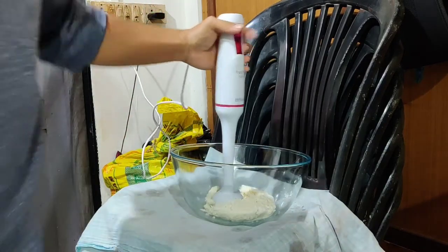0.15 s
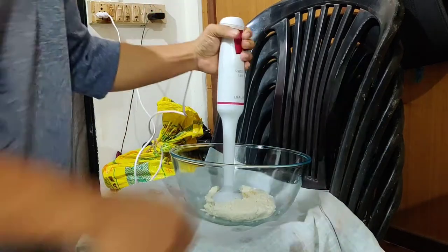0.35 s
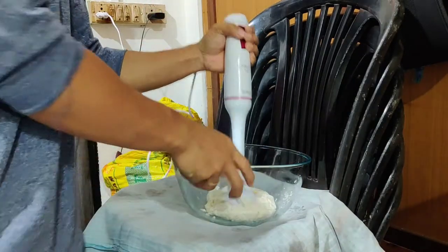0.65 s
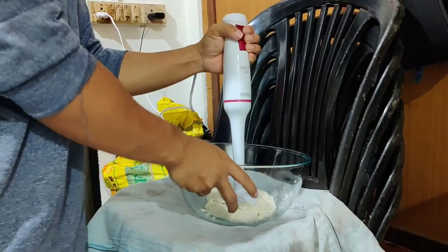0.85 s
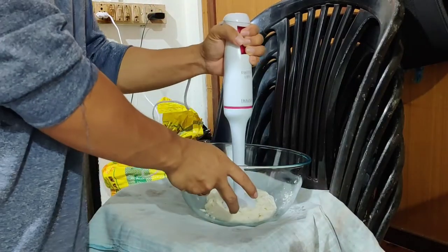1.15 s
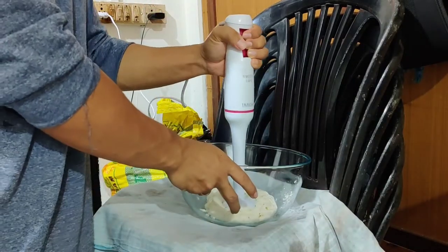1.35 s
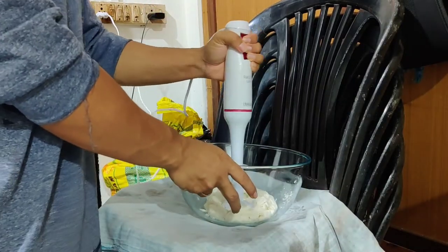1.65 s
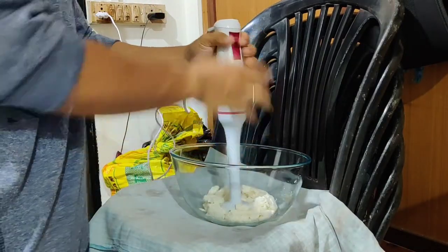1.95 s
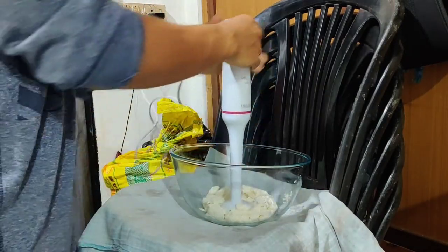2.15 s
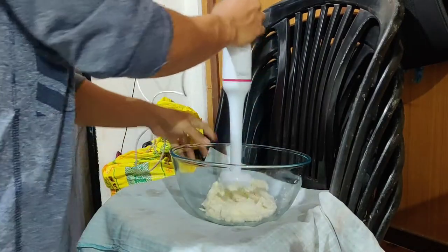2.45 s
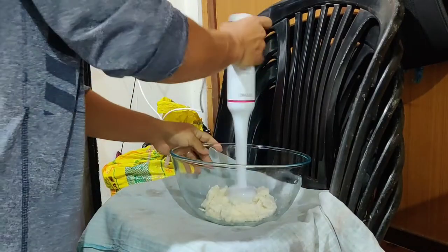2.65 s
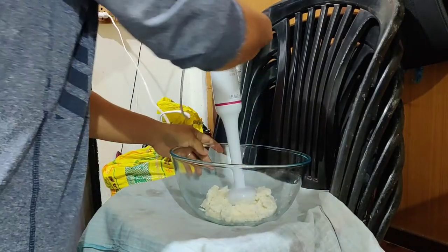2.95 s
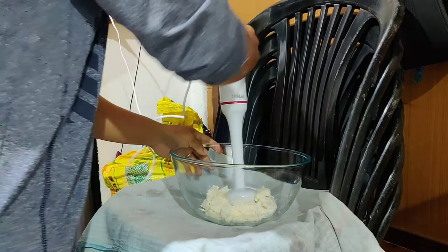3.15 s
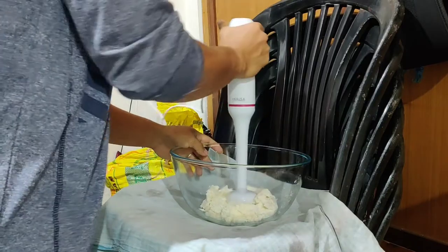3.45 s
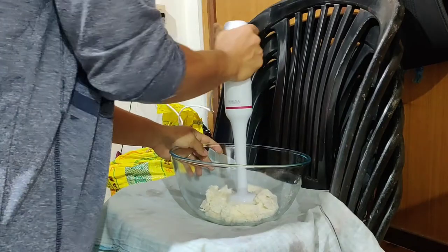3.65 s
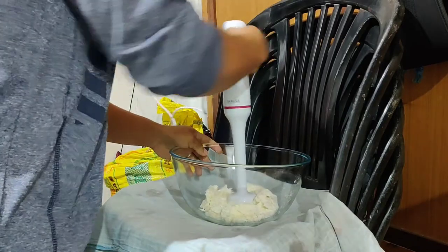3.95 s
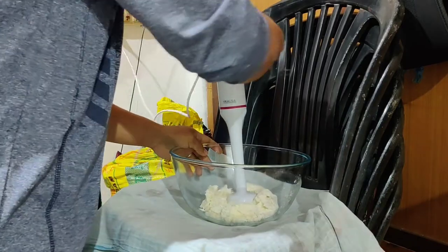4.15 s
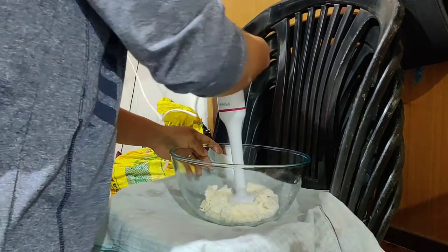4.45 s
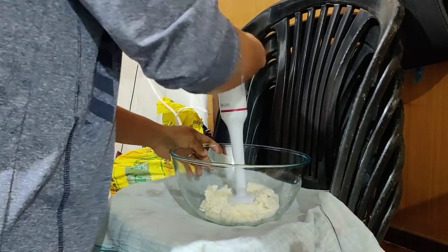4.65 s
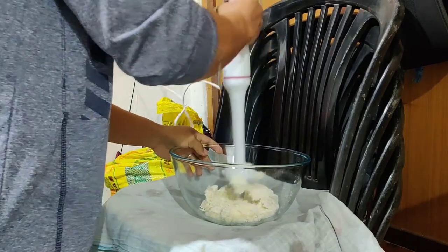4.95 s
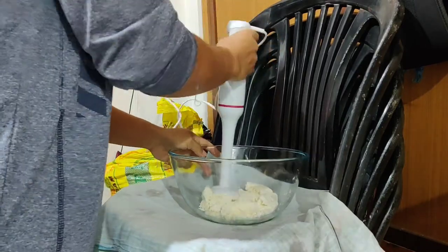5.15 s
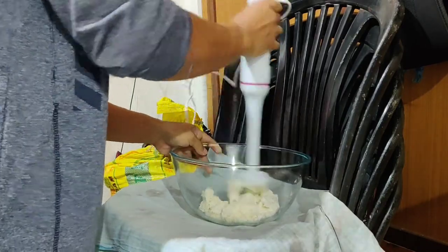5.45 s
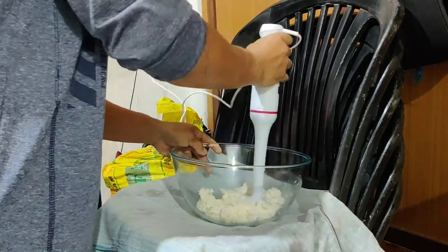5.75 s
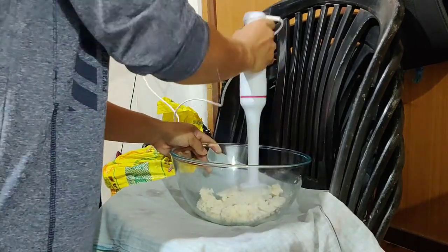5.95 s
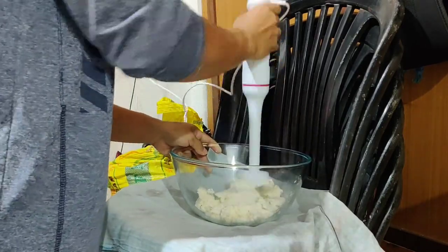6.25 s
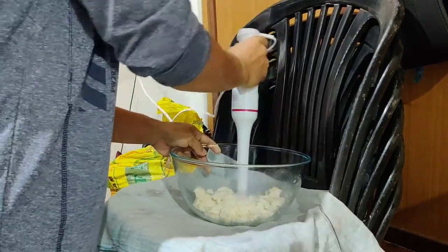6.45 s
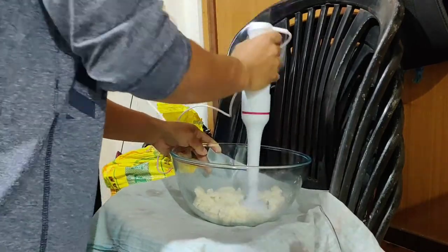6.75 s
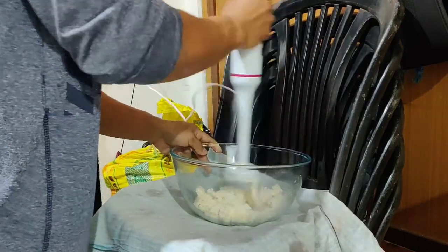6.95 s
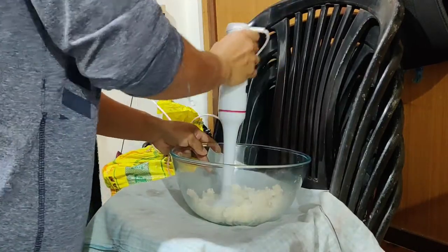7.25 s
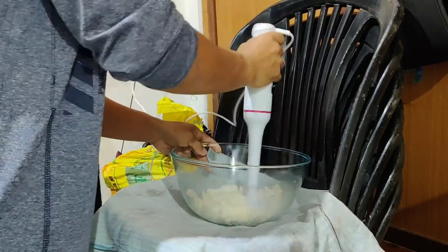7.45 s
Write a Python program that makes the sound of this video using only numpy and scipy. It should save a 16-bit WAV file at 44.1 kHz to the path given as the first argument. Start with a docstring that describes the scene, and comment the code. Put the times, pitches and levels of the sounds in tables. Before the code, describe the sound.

In a small, hard-walled kitchen, light knocks and sleeve rustle sound over a faint appliance murmur. A switch ticks and a stick blender whirs in a glass bowl of thick cream cheese, whining, rattling and splattering until it stops with a dull thud. After a pause comes a second burst, then seven quick pulses with ticks in between, all picked up in stereo by a nearby phone.

```python
"""A mains-driven stick blender works thick cream cheese in a glass bowl, in a small hard kitchen.
First come small knocks and sleeve rustle over a murmur of appliances. At 1.2 s the switch ticks and a
long burst begins: the shaft's orders sing through the housing with mains ripple, over rattle, splatter
and brush hiss, until the blade stalls with a thud. A second long burst follows at 4.3 s, then seven quick
pulses from 5.2 s, with ticks in the pauses. A phone with two unlike ports listens throughout."""
import sys
import numpy as np
from scipy import signal
from scipy.fft import rfft, irfft, next_fast_len
from scipy.io import wavfile
from scipy.ndimage import uniform_filter1d

SR = 44100
rng = np.random.default_rng(int(sys.argv[2]) if len(sys.argv) > 2 else 0)


def unload_audio(sound):
    """Save the sound as a 16-bit wav file, at the path given as the first command line argument."""
    columns = np.transpose(np.atleast_2d(sound))
    # keep every value between -1 and 1, then stretch to whole-number steps
    steps = np.round(np.clip(columns, -1, 1) * 32767)
    wavfile.write(sys.argv[1], SR, steps.astype(np.int16))


N = 335043
T = np.arange(N) / SR
MAINS_RIPPLE_HZ = 99.56
# the blade stalls as the switch lets go: t/s, thud level/dB, rattle level/dB, splatter level/dB
BLADE_STALLS = [(1.984, -30.5, -36.5, -32), (4.812, -19, -31.5, -29.5), (5.454, -34.5, -59, -44),
                (6.246, -28, -51, -40), (6.583, -28, -42, -38), (6.94, -27.5, -34, -36),
                (7.295, -23.5, -30.5, -33)]


def blender(press, load):
    """Rotating machinery: one shaft angle drives the tones and modulates the noises. Returns both."""
    on, off, start_hz, rattle_db, splatter_db, brush_db, pan_db = press
    spin_up_s, attack_s, release_s = .03, .025, .04
    t = np.arange(on, off + release_s, 1 / SR)
    times, *columns = np.transpose(load)
    hz, whine_db, second_db = (np.interp(t, times, column) for column in columns)
    hz -= (hz - start_hz) * np.exp(-((t - on) / spin_up_s) ** 2)
    shaft_hz = hz / 4 * (1 + .002 * walk(40, len(t)))
    turn = 2 * np.pi * np.cumsum(shaft_hz) / SR
    mains = 2 * np.pi * MAINS_RIPPLE_HZ * t
    tones = motor_whine(turn, mains, whine_db, second_db, pan_db)
    # one knock a turn and the mains ripple roughen the noises
    roughness = (1 + .087 * np.cos(turn)) * (1 + .07 * np.cos(mains))
    noises = housing_rattle(t, turn, mains, roughness, rattle_db)
    noises += roughness * cheese_splatter(t, splatter_db, brush_db)
    starting = np.clip(1 - (t - on) / attack_s, 0, 1)
    stopping = np.clip((t - off) / release_s, 0, 1)
    switch = undb(-24.5 * starting - 16.5 * stopping) * np.minimum(1, (t[-1] - t) / .0051)
    return tones * switch * undb(-63 * stopping), noises * switch


def motor_whine(turn, mains, whine_db, second_db, pan_db):
    """Modulation: mains ripple puts sidebands on the fourth shaft order; the second sounds below it."""
    size, ripple = len(turn), .096
    fourth = np.sin(4 * turn + ripple * np.sin(mains + 1.1)) * (1 + ripple * np.cos(mains))
    fourth *= undb(whine_db + 1.8 * walk(30.1, size))
    sides = np.array([[1], [-1]])
    swaying_pan_db = pan_db + 4.5 * walk(12, size)
    second = np.sin(2 * turn) * undb(second_db + 1.2 * sides + walk(30, size))
    return np.sqrt(2) * (fourth * undb(sides * swaying_pan_db / 2) + second)


def housing_rattle(t, turn, mains, roughness, level_db):
    """Forced vibration: the housing radiates hum, weak shaft orders and noise, surging at each stall."""
    # weaker shaft orders: multiple of the shaft rate, level/dB re the rattle
    weak_orders = [(1, -23), (3, -16), (5, -36.5), (6, -13), (7, -8), (8, -8), (9, -13.5), (10, -14.5),
                   (11, -12.5), (12, -16), (13, -9)]
    # housing noise: f/Hz, spectrum level/dB
    rattle_spectrum = [(70, -30.5), (150, -17), (300, -11.5), (550, -0.5), (1100, -2.5), (1900, 0.5),
                       (2500, -1.5), (3200, -7)]
    size = len(t)
    vibration = roughness * noise(rattle_spectrum, size) * undb(.65 * walk(45, size))
    vibration += undb(-25) * np.sin(mains)
    for order, db in weak_orders:
        # each order comes and goes as the load shifts, with its own path to each port
        phase = rng.uniform(0, 2 * np.pi) + rng.normal(0, .12 * order, (2, 1))
        partial = np.sin(order * turn + phase + .5 * np.sin(mains))
        vibration += partial * undb(db + 4.15 * walk(11.98, size))
    shaken = swells(t, [stall_surge(s, db) for s, _, db, _ in BLADE_STALLS])
    return vibration * np.sqrt(undb(2 * level_db) + shaken)


def cheese_splatter(t, splatter_db, brush_db):
    """Incoherent sources add in power: spurts of cheese swell the blade's splatter and brush hiss."""
    # cheese flung against the glass: t/s, level/dB, half-length/s
    spurts = [(1.29, -51, 0.034), (1.65, -37.5, 0.05), (1.753, -29.5, 0.0301), (1.858, -31.5, 0.03),
              (1.925, -30, .05), (1.991, -36.5, 0.0295), (4.365, -49, 0.0099), (6.1, -38.5, 0.014),
              (6.457, -31.5, 0.017), (7.21, -40.5, 0.024)]
    # wet splatter and the higher brush hiss: f/Hz, spectrum level/dB
    splatter_spectrum = [(1900, -24.5), (2600, -2), (4000, 2.5), (5500, -2.5), (6400, -5), (7500, -29)]
    brush_spectrum = [(5500, -33.5), (6600, 1), (9000, -2), (11000, -3), (14500, -7.5), (16000, -17)]
    size = len(t)
    flung = swells(t, spurts + [stall_surge(s, db) for s, _, _, db in BLADE_STALLS])
    splatter = noise(splatter_spectrum, size) * undb(1.3 * walk(59.2, size))
    brush = noise(brush_spectrum, size) * undb(.55 * walk(78, size))
    splatter_power = undb(2 * splatter_db) + flung
    brush_power = undb(2 * brush_db) + flung * undb(-4) ** 2
    return splatter * np.sqrt(splatter_power) + brush * np.sqrt(brush_power)


def stall(db, start_hz=616, t60=.06):
    """Viscous braking: the cheese stops the blade, so the whine slides down over a dull thud."""
    t = np.arange(int(t60 * SR)) / SR
    slide = np.sin(2 * np.pi * np.cumsum(start_hz * np.exp(-t / .028)) / SR)
    thud = noise([(80, -13.5), (220, -3.5), (600, 14.5), (1300, -11), (2200, -24.5)], len(t))
    return undb(db - 60 * t / t60) * np.minimum(t / .0022, 1) * (1.3 * slide + .81 * thud)


def stall_surge(s, db):
    """A braking transient peaks just after the stall: t/s, level/dB, half-length/s."""
    return s + .016, db, .022


def tick(db, hz, t60=.03):
    """Impact excitation: a sharp contact gives a broad, damped puff of noise round the part's pitch."""
    t = np.arange(int(t60 * SR)) / SR
    band = [(hz / 6, -30), (hz / 3.7, -6), (hz, 0),
            (min(hz * 2.22, 15000), -7), (min(hz * 5, 20000), -26)]
    return undb(db - 3 - 60 * t / t60) * noise(band, len(t))


def throbbing_band(length, hz, width, db):
    """Band-limited noise, throbbing at random: a whistle or ring when narrow, a scrape when wide."""
    t = np.arange(int(length * SR)) / SR
    band = [(hz - 2 * width, -40), (hz - width / 2, -3), (hz, 0),
            (hz + width / 2, -3), (hz + 2 * width, -40)]
    fade = np.minimum(1, np.minimum(t, length - t) / .0085)
    return noise(band, len(t)) * undb(db + 2.5 * walk(30, len(t))) * fade


def kitchen(x, t60, echo_db):
    """Reverberation: the direct sound plus a diffuse tail that decays exponentially."""
    t = np.arange(int(t60 * SR)) / SR
    response = noise([(20, .11), (300, 1), (16000, -.78)], len(t))
    response *= undb(-60 * t / t60) * np.minimum(t / .01, 1)
    response *= undb(echo_db) / np.sqrt(np.sum(response ** 2) / 2)
    response[:, 0] = 1  # the direct path
    return signal.fftconvolve(np.atleast_2d(x), response, axes=1)


def background(hum_hz=136.5):
    """Ambient noise: appliances, air, sleeves and handling superpose, each flickering a little."""
    # noise floor: t/s, appliance murmur level/dB, air hiss level/dB, handling rumble level/dB
    floor = [(0, -67.5, -73, -44.5), (.6, -65.5, -61.5, -51.5), (1.149, -66, -75, -59.5),
             (2.4, -65.5, -66, -60.5), (4.199, -66.5, -74, -70), (5.1, -64, -85, -64.5),
             (5.7, -70, -78.5, -98.5), (7.6, -67.5, -89, -92)]
    # sleeve rustles: t/s, level/dB, half-length/s
    sleeves = [(0.523, -59, 0.069), (0.78, -48.5, 0.082), (1.12, -67.5, 0.035), (2.513, -63, 0.019),
               (2.713, -65, .03), (3.802, -68, 0.24), (4.26, -65, .02), (5.201, -71, 0.033),
               (5.585, -66.5, 0.062), (6.071, -58, 0.014), (6.453, -65, 0.043), (6.786, -59, 0.027),
               (7.116, -54.5, 0.015), (7.51, -63, 0.051)]
    # appliance murmur, and the hiss of air and cloth: f/Hz, spectrum level/dB
    murmur_spectrum = [(24, -23.5), (40, -8.5), (112, -10.5), (130, -11.5), (242, -7), (315, -14),
                       (371, -9.5), (498, -10.5), (1020, -15), (2000, -27.5), (2600, -64), (4400, -120)]
    rustle_spectrum = [(600, -30), (1300, -7.5), (3000, -2), (6000, -4.5), (10000, -5.5), (13000, -8.5),
                       (16000, -15)]
    times, *columns = np.transpose(floor)
    murmur_db, air_db, rumble_db = (np.interp(T, times, column) for column in columns)
    murmur = noise(murmur_spectrum, N) + undb(-9.5) * np.sin(2 * np.pi * hum_hz * T + walk(3.6, N))
    murmur *= undb(murmur_db + .78 * walk(15, N))
    rustle_power = undb(2 * air_db) + swells(T, sleeves)
    rustle = noise(rustle_spectrum, N) * np.sqrt(rustle_power) * undb(1.2 * walk(25, N))
    rumble = noise([(2, -1), (8, .5), (20, -8), (45, -24)], N) * undb(rumble_db + 2.7 * walk(2.7, N))
    return murmur + rustle + rumble


def noise(spectrum, size):
    """Partial coherence: stereo noise of rms 1, most alike in the bass, from rows of f/Hz, level/dB."""
    # likeness of the sound at the two ports: f/Hz, correlation
    coherence = [(30, 0.12), (80, 0.48), (300, 0.74), (600, 0.52), (1200, 0.048), (3000, 0.31), (6000, 0)]
    fast = next_fast_len(size)
    like = np.clip(over_hz(coherence, fast), 0, 1)
    gain = undb(over_hz(spectrum + [(spectrum[-1][0] * 1.1, -90)], fast))
    mid, side = rfft(rng.standard_normal((2, fast))) * gain
    mid, side = mid * np.sqrt(1 + like), side * np.sqrt(1 - like)
    x = irfft([mid + side, mid - side], fast)[:, :size]
    return x / np.sqrt(np.mean(x ** 2))


def swells(t, rows):
    """Power summation of bell-shaped swells given as t/s, level/dB, half-length/s."""
    return sum(undb(2 * db) * np.exp(-((t - s) / half) ** 2) for s, db, half in rows)


def walk(rate, size):
    """Random fluctuation: values held 1 / rate s and slewed, with a spread near 1."""
    hold = int(SR / rate)
    steps = np.repeat(rng.standard_normal(size // hold + 1), hold)
    return 1.285 * uniform_filter1d(steps, hold)[:size]


def over_hz(table, size):
    """Interpolation of a table at the bins of a transform, on a log-frequency axis."""
    hz, value = np.transpose(table)
    return np.interp(np.log(np.arange(size // 2 + 1) * SR / size + 1), np.log(hz), value)


def undb(db):
    """Amplitude ratio of a level."""
    return 10 ** (np.asarray(db) / 20)


def add(out, x, s):
    """Superposition of x on out from time s."""
    i = int(s * SR)
    out[:, i:i + x.shape[-1]] += x[..., :N - i]


def scene():
    """Linear superposition of the blender, the contacts, their reverberation and the background."""
    # switch presses: on t/s, off t/s, starting whine f/Hz, rattle, splatter and brush hiss level/dB,
    # whine left minus right level/dB
    presses = [(1.167, 1.984, 408.3, -39.5, -42, -43.5, -1), (4.286, 4.813, 412.6, -39, -41, -44.5, -3.5),
               (5.23, 5.449, 507, -40, -44.5, -46.5, -7), (5.678, 5.861, 550.6, -39, -41.5, -46, -2.5),
               (6.095, 6.256, 569, -36.5, -41.5, -46, 2), (6.453, 6.603, 596, -39, -43, -47, -9),
               (6.809, 6.948, 621.7, -37, -41, -45, 12), (7.144, 7.339, 565, -38, -41.5, -46, 10.5),
               (7.519, 7.618, 587, -37, -42, -44.5, 9)]
    # motor under load, a table a press: t/s, whine f/Hz, whine level/dB, second order level/dB
    loads = [
        [(1.2, 590, -38, -53), (1.25, 604, -26.5, -43.5), (1.32, 594, -26, -53), (1.358, 594, -51, -42),
         (1.39, 597, -32, -42), (1.47, 591, -40, -41.5), (1.56, 593, -34, -40.5), (1.61, 594, -25, -39),
         (1.7, 602, -25, -54), (1.8, 615, -24, -40), (1.985, 617, -25, -34.5)],
        [(4.32, 600, -39.5, -53), (4.36, 618, -24.5, -49), (4.4, 626, -31.5, -41.5), (4.47, 612, -24.5, -48),
         (4.54, 610, -24.5, -69), (4.65, 603, -27.5, -53.5), (4.7, 604, -22, -41), (4.75, 613, -22, -61),
         (4.8, 620, -20.5, -42.5)],
        [(5.26, 600, -54, -48), (5.28, 600, -50, -37), (5.35, 606, -36, -44), (5.385, 608, -25.5, -31),
         (5.455, 608, -31, -42)],
        [(5.7, 598, -41, -60), (5.72, 593, -36, -53), (5.755, 590, -40, -43), (5.85, 603, -31, -51)],
        [(6.12, 598, -44, -55), (6.15, 613, -43, -55), (6.17, 627, -27.5, -63), (6.22, 626, -38.5, -42),
         (6.255, 638, -29, -60)],
        [(6.475, 604, -43, -46), (6.505, 621, -33, -43), (6.565, 628, -32.5, -46), (6.6, 634, -32, -45)],
        [(6.83, 638, -44, -56), (6.86, 647, -36, -45), (6.89, 652, -30.5, -59), (6.94, 667, -36.5, -35.5)],
        [(7.165, 610, -48, -46), (7.197, 641, -31, -37), (7.275, 666, -34, -37), (7.298, 664, -26, -39),
         (7.33, 662, -29.5, -45)],
        [(7.55, 647, -42, -53), (7.57, 665, -26, -38), (7.59, 671, -32, -41)],
    ]
    # high motor whistle, ringing of housing and bowl, and faint scrapes:
    # from t/s, to t/s, centre f/Hz, width/Hz, level/dB
    bands = [(1.22, 1.62, 7240, 140, -49), (4.32, 4.8, 1910, 70, -42), (6.575, 6.615, 1300, 50, -41),
             (6.925, 6.98, 1670, 40, -40), (3.553, 3.69, 5400, 1500, -69), (3.568, 3.62, 2100, 700, -68)]
    # switch ticks and small knocks: t/s, level/dB, centre f/Hz
    contacts = [(0.27, -48, 108), (0.364, -65, 4000), (0.388, -33, 553), (0.549, -51, 1510),
                (0.75, -45.5, 1230), (1.02, -55.5, 900), (1.043, -48, 1000), (1.061, -48, 960),
                (1.166, -35, 5410), (1.175, -42.5, 2000), (2.487, -40.5, 4920), (2.687, -43.5, 4430),
                (2.755, -51.5, 649), (3.255, -45, 1980), (3.751, -49.5, 2440), (3.789, -46, 4670),
                (3.94, -42.5, 2970), (4.014, -45.5, 870), (4.283, -36, 5100), (5.169, -62, 2040),
                (5.546, -41, 1540), (5.975, -40, 2140), (6.35, -37.5, 2250), (6.469, -23.5, 2070),
                (6.7, -47.5, 1470), (6.758, -47.5, 2000), (7.097, -45.5, 3030), (7.451, -40, 1900)]
    # the level dips briefly: t/s, level/dB, recovery time constant/s
    dips = [(5.026, -9, 0.021), (5.069, -19, 0.028)]
    out = background()
    for press, load in zip(presses, loads):
        on, off = press[:2]
        t60, echo_db = (.46, -1) if off - on > .4 else (.24, -13.5)  # long bursts echo more
        whine, noises = blender(press, load)
        add(out, kitchen(whine, t60, echo_db - 8) + kitchen(noises, t60, echo_db), on)
    for start, end, hz, width, db in bands:
        add(out, throbbing_band(end - start, hz, width, db), start)
    for s, db, _, _ in BLADE_STALLS:
        add(out, kitchen(stall(db), t60=.3, echo_db=-13), s)
    for s, db, hz in contacts:
        add(out, kitchen(tick(db, hz), t60=.3, echo_db=-4), s)
    for s, db, recovery in dips:
        out *= undb(db * np.exp(-np.maximum(T - s, 0) / recovery) * (T >= s))
    return out


def record(dry):
    """Frequency response: each port colours the treble; faint self-noise joins and the top is cut."""
    # responses of the phone's ports: f/Hz, level/dB
    left_port = [(100, 0.5), (2400, -0.5), (4200, -1), (5700, 8), (7000, -5), (8500, -8.5), (11000, -12.5),
                 (15000, -7)]
    right_port = [(100, -1), (2400, -1), (4200, -3.5), (5700, -2), (7200, 1), (8200, 3.5), (9200, 6.5),
                  (11000, -3.5), (15000, 1)]
    self_noise_db, top_hz = -73, 15700
    size = next_fast_len(N + 4096)
    ports = undb([over_hz(left_port, size), over_hz(right_port, size)])
    heard = irfft(rfft(dry, size) * ports, size)[:, :N]
    heard += undb(self_noise_db) * rng.standard_normal((2, N))
    return signal.sosfilt(signal.ellip(10, .2, 80, top_hz, fs=SR, output="sos"), heard)


dry = scene()
out = record(dry)
unload_audio(out)
```